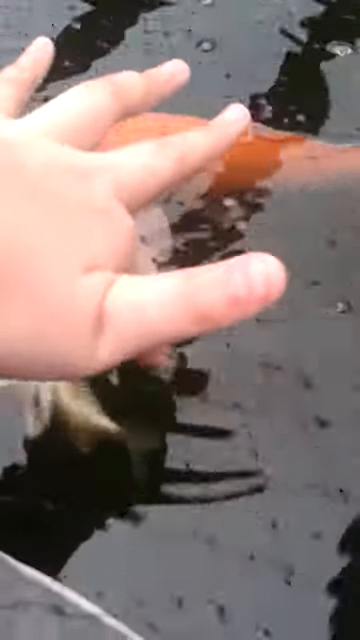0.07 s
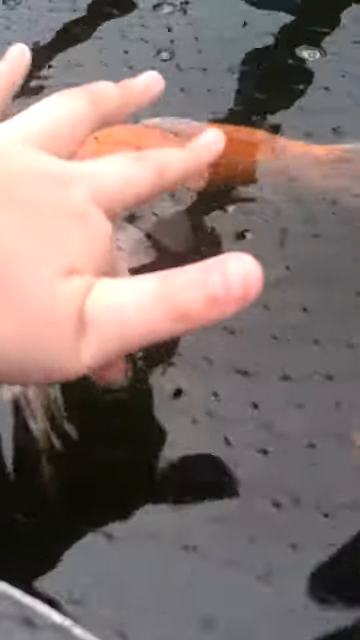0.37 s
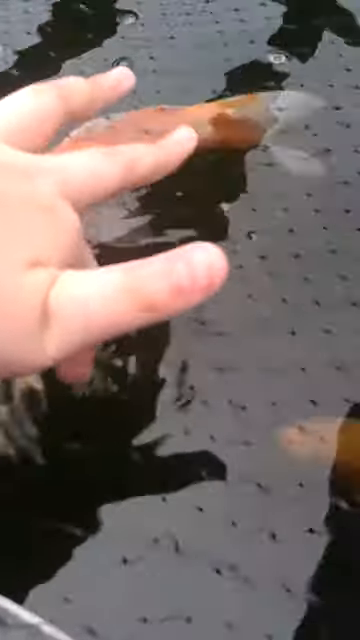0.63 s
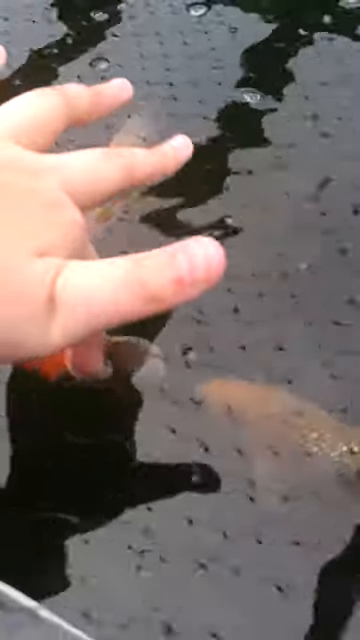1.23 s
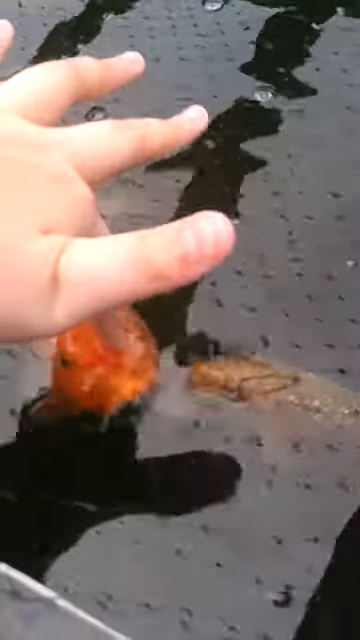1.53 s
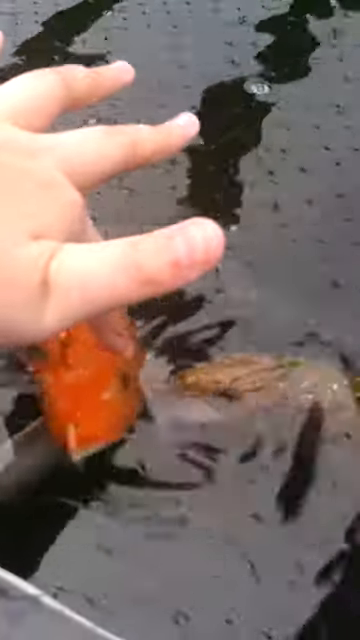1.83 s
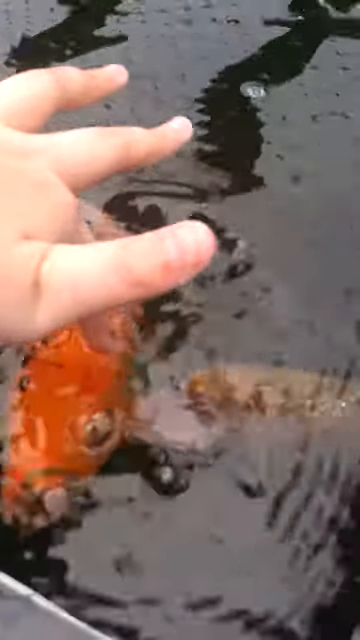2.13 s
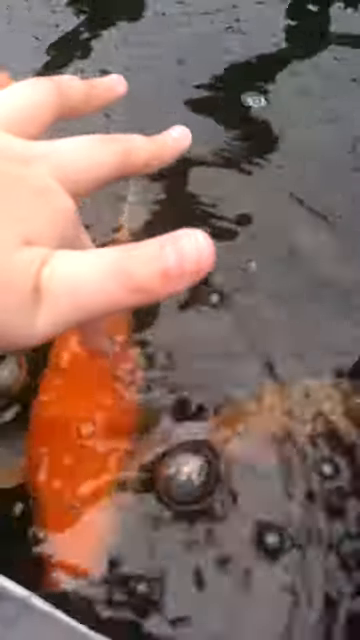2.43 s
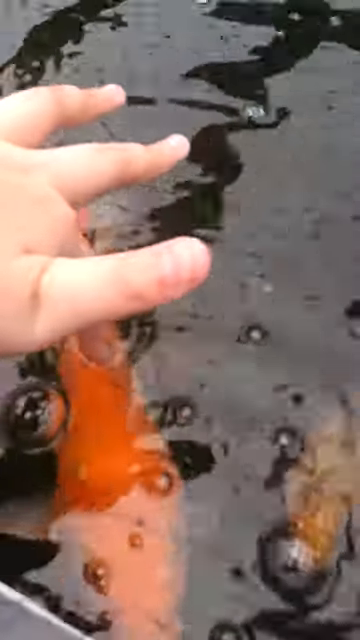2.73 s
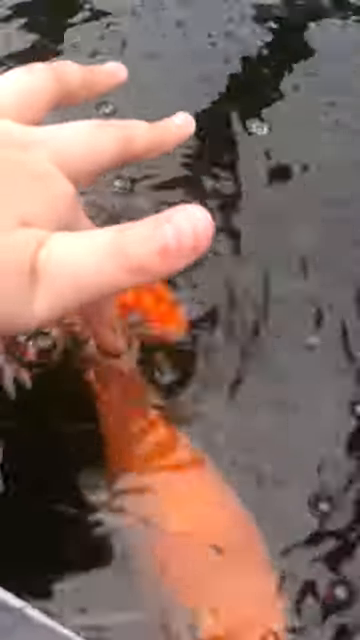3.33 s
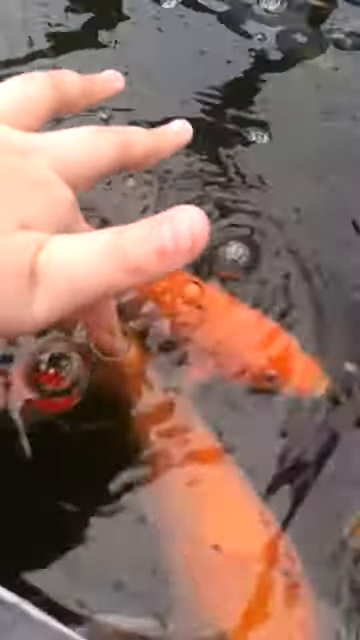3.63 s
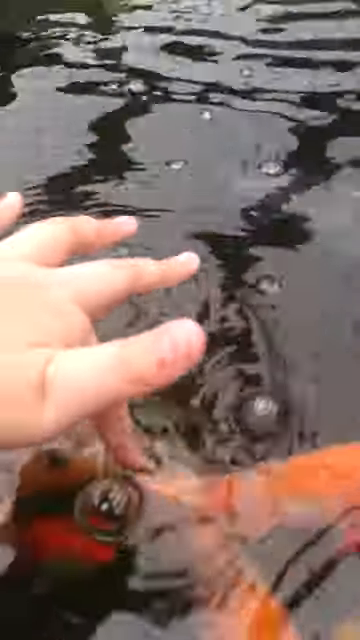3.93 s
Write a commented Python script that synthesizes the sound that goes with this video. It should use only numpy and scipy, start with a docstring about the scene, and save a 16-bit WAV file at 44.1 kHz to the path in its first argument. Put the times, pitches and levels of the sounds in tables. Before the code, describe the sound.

Fish mouths gulp and smack at a pond surface. In the first second there are only soft laps, faint swishes and tiny bubble pops. A small gulp comes at 1.3 seconds, a few rising gulps around 1.8, and a bright bubble click at 2.2. At 3 seconds one mouth smacks loudly and wetly with a brief fizz, followed by another gulp. Faint outdoor air and pump hum continue underneath.

```python
"""A faint pump hum, a low rumble and outdoor air are heard first, over a quiet pond where koi feed.
Tiny bubbles burst, water laps, a sleeve or water swishes as a hand moves, and mouths plop and gulp.
Each gulp is an air pocket in resonance, its pitch mostly rising as its size changes. Near 3 s one mouth
smacks loudly: wet lips part in a quick run of snaps that ring the mouth and the hollow under the
outstretched hand, and foam fizzes briefly."""
import sys
import numpy as np
from scipy import signal
from scipy.fft import rfft, irfft
from scipy.io import wavfile
from scipy.ndimage import uniform_filter1d

SR = 44100
rng = np.random.default_rng(int(sys.argv[2]) if len(sys.argv) > 2 else 0)


def master(y):
    """Save y as 16-bit WAV."""
    cut = np.clip(np.atleast_2d(y).T, -1, 1)
    pcm = np.round(cut * 32767)  # scale
    wavfile.write(sys.argv[1], SR, pcm.astype(np.int16))


N = 176400

# Levels in the tables are relative.
# partials of the pump (frequency [Hz], level [dB])
PUMP_PARTIALS = [(50, -74), (100.2, -67.5), (125, -76.5), (150, -89.5), (250, -82), (301, -80.5),
                 (500, -83), (1001, -81.5)]
# spectrum of outdoor air (frequency [Hz], level [dB])
AIR_SPECTRUM = [(76, -33), (130, 1), (217, -5.5), (249, -3), (275, -4), (342, -2.5), (425, -5.5), (549, -7),
                (953, -14), (1030, -12.5), (1440, -16), (1760, -17), (4710, -24), (6210, -23),
                (14500, -26.5)]
# slow swell of the air (time [s], level [dB])
AIR_ENVELOPE = [(0, 1), (.8, 0.7), (1.2, -1.6), (1.55, 1.3), (2.1, 1.1), (2.6, -1.6), (2.95, 0), (3.3, 0.8),
                (4, 1)]
# slow swell of the rumble (time [s], level [dB])
RUMBLE_ENVELOPE = [(0, 6), (.8, 5.5), (1.25, -2.5), (1.7, 1.5), (2.1, 0), (2.3, -13.5), (2.8, -6),
                   (3.2, 4.5), (4, 4.5)]
# tiny bursting bubbles (time [s], frequency [Hz], rise [s], level [dB])
BURSTS = [(.028, 6300, 0.0027, -61), (.546, 6270, .003, -58.5), (.547, 4350, .003, -61),
          (0.949, 6200, 0.0025, -59.5), (1.535, 6400, .007, -55.5), (2.2291, 9060, .0004, -40),
          (2.2293, 6350, 0.00064, -48), (2.2290, 12000, 0.00033, -47), (2.348, 13900, .0005, -54),
          (2.682, 6430, .003, -64), (2.928, 2650, .007, -67), (3.109, 8780, .001, -47),
          (3.1088, 11200, .0008, -55), (3.1093, 6070, 0.0011, -45.5), (3.409, 6200, 0.0034, -55.5),
          (3.427, 3520, 0.0015, -61.5), (3.668, 6700, .002, -62), (3.956, 8600, 0.0038, -62)]
# spectrum of the reflections (frequency [Hz], level [dB])
ECHO_SPECTRUM = [(200, 17), (800, 9), (1600, 2.5), (3000, -2.5), (4600, 10.5), (6400, 1), (9000, -3),
                 (14000, -14)]
# laps of water (time [s], duration [s], level [dB])
LAP_EVENTS = [(0.128, 0.071, -50.5), (0.218, 0.047, -58.5), (0.903, .09, -53.5)]
# spectrum of a lap (frequency [Hz], level [dB])
LAP_SPECTRUM = [(25, -24), (45, -14), (68, 9.5), (110, -4.5), (190, -16), (290, -8), (420, -24),
                (1500, -33), (6000, -42.5)]
# faint swishes of a sleeve or water as a hand moves (time [s], duration [s], level [dB])
SWISH_EVENTS = [(0.289, 0.19, -64), (0.407, 0.1, -65), (0.493, .12, -66.5), (0.923, 0.13, -69),
                (1.757, .15, -69.5)]
# spectrum of a swish (frequency [Hz], level [dB])
SWISH_SPECTRUM = [(150, 8), (400, 11), (1200, 4), (3200, -2), (4500, 0.5), (6500, 0.5), (8000, -9),
                  (14000, -14)]
# splashy plops, and at 1.533 s the broad part of a bubble burst (time [s], centre [Hz], half-width [Hz], rise
# [s], level [dB])
PLOP_EVENTS = [(0.546, 1210, 900, 0.0043, -62), (.680, 2270, 1100, 0.0036, -65),
               (1.336, 550, 400, 0.0062, -58), (1.533, 3050, 1830, 0.0069, -66.5),
               (1.779, 1000, 350, .006, -64.5), (3.034, 910, 249, 0.00085, -45),
               (3.151, 800, 400, 0.0013, -51)]
# gulped air (time [s], first pitch [Hz], pitch at closing [Hz], time to closing [s], rise [s], level [dB])
AIR_POCKETS = [(1.3395, 503, 565, 0.015, 0.00218, -49), (1.385, 387, 308, 0.024, 0.018, -62.5),
               (1.7873, 388, 422, .03, 0.00316, -44.5), (1.826, 458, 730, 0.028, 0.0063, -46.5),
               (1.826, 623, 1010, 0.0239, 0.0078, -48), (1.852, 935, 1420, 0.0643, 0.01, -54),
               (2.062, 131, 150, .03, .006, -56.5), (2.245, 600, 1310, 0.082, .024, -71),
               (3.131, 595, 910, 0.0154, 0.0045, -58.5), (3.151, 990, 1380, 0.03, 0.0014, -48),
               (3.157, 1256, 1940, 0.022, 0.0062, -51.5)]
# snaps of the smack (time [s], mouth level [dB], lip level [dB], film level [dB], film pitch [Hz])
LIP_SNAPS = [(3.0174, -57, -35.5, -27.5, 6430), (3.0220, -36, -44, -27.5, 6700),
             (3.0243, -36, -36, -28.5, 6100), (3.0271, -30, -32, -21, 6960), (3.0291, -20, -46, -21, 6750),
             (3.0306, -42, -30, -20, 6480), (3.0327, -44, -49, -20, 6050)]
# spectrum of the spray (frequency [Hz], level [dB])
SPRAY_SPECTRUM = [(300, -27), (600, -3), (1100, -5.5), (1600, 6), (2100, -2), (2700, 6.5), (4500, -2.5),
                  (5200, -11), (6300, 5), (8200, -5), (10500, -8.5), (14500, -14)]
# modes of the hollow under the hand (frequency [Hz], T60 [s], level [dB])
HOLLOW_MODES = [(1030, .03, -5), (1590, 0.072, -6), (2720, 0.035, -4), (3200, .04, -15), (3700, 0.022, 3.5),
                (5870, 0.04, -2), (7010, .02, -14)]
# spectrum of the foam (frequency [Hz], level [dB])
FOAM_SPECTRUM = [(400, -0.5), (1500, -7), (2300, -6.5), (4700, -2), (5300, -8.5), (6400, -7), (7300, -2),
                 (8000, -8), (9500, -9), (12000, -23), (14500, -22.5)]


def undb(db):
    """Decibels are a logarithmic scale: amplitude grows tenfold per 20 dB."""
    return 10 ** (np.asarray(db) / 20)


def unit(x):
    """Normalisation to an rms of 1."""
    return x / np.sqrt(np.mean(x ** 2))


def clock():
    """Uniform sampling: the time of every sample in seconds."""
    return np.arange(N) / SR


def noise(spectrum):
    """Spectral shaping: noise follows (frequency [Hz], level [dB]) points, fading below the first."""
    hz, db = np.array(spectrum, float).T
    f = np.arange(N // 2 + 1) * SR / N + 1
    gain = undb(np.interp(np.log(f), np.log(hz), db)) * np.minimum(f / hz[0], 1) ** 2
    return unit(irfft(rfft(rng.standard_normal(N)) * gain, N))


def band(hz, half_width):
    """Resonance: noise confined to one steep-sided band."""
    f = np.arange(N // 2 + 1) * SR / N
    attenuation = (1 + ((f - hz) / half_width) ** 2 / 2) ** 2
    return unit(irfft(rfft(rng.standard_normal(N)) / attenuation, N))


def drift(per_s):
    """A moving average smooths random steps into a drift of rms 1."""
    hold = int(SR / per_s)
    steps = np.repeat(rng.standard_normal(N // hold + 1), hold)
    return unit(uniform_filter1d(steps, hold)[:N])


def swell(start, rise):
    """Critically damped response: a peak after the rise time, then decay."""
    u = np.clip((clock() - start) / rise, 0, 40)
    return u * np.exp(1 - u)


def arch(start, length):
    """Amplitude envelope: the square root of half a sine cycle."""
    return np.sqrt(np.abs(np.sin(np.pi * np.clip((clock() - start) / length, 0, 1))))


def ping(start, hz, rise, hz_per_s=0):
    """Damped oscillation: a resonator rings briefly, gliding if its size changes."""
    age = np.maximum(clock() - start, 0)
    pitch = np.clip(hz + hz_per_s * age, hz / 2, SR / 2) * (age > 0)
    return swell(start, rise) * np.sin(2 * np.pi * np.cumsum(pitch) / SR)


def pump_hum(waver_db=0.5, waver_rad=0.28):
    """Amplitude and phase modulation: each partial of the pump wavers at random."""
    hum = 0
    for hz, db in PUMP_PARTIALS:
        amplitude = np.sqrt(2) * undb(db + waver_db * drift(5.18))
        phase = 2 * np.pi * (hz * clock() + rng.random()) + waver_rad * drift(4.6)
        hum += amplitude * np.sin(phase)
    return hum


def outdoor_air(base_db=-66, flicker_db=0.52):
    """Broadband noise: a flickering hiss and a faint treble band swell together."""
    hiss = undb(base_db + flicker_db * drift(40)) * noise(AIR_SPECTRUM)
    sheen = undb(-81) * band(hz=6000, half_width=970)
    return (hiss + sheen) * undb(np.interp(clock(), *np.array(AIR_ENVELOPE).T))


def rumble(base_db=-74):
    """Narrowband noise: a low rumble slowly swells and sinks."""
    level_db = base_db + np.interp(clock(), *np.array(RUMBLE_ENVELOPE).T)
    return undb(level_db) * band(hz=57.3, half_width=17)


def bursting_bubbles(relative_width=0.094):
    """Transient excitation: each tiny bubble bursts with a short, bright band of noise."""
    return sum(undb(db) * swell(start, rise) * band(hz, relative_width * hz) / 2
               for start, hz, rise, db in BURSTS)


def reflections(direct, delay_s=0.0059):
    """Reverberation: quick echoes from the pond's edge and a faint longer tail join the direct sound."""
    age = clock() - delay_s
    response = 0
    for db, t60 in ((-16.5, 0.075), (-27.5, 0.55)):  # near, far
        tail = noise(ECHO_SPECTRUM) * (age > 0) * np.exp(-np.log(1000) * np.abs(age) / t60)
        response += undb(db) * tail / np.sqrt(2 * np.sum(tail ** 2))
    return direct + signal.fftconvolve(direct, response)[:N]


def laps():
    """Enveloped noise: water laps in low, rounded pulses."""
    return noise(LAP_SPECTRUM) * sum(undb(db) * arch(start, length) for start, length, db in LAP_EVENTS)


def swishes(grain_db=1.5, grains_per_s=350):
    """Random amplitude modulation: soft, grainy swishes of a sleeve or water as a hand moves."""
    grainy = unit(noise(SWISH_SPECTRUM) * undb(grain_db * drift(grains_per_s)))
    return grainy * sum(undb(db) * arch(start, length) for start, length, db in SWISH_EVENTS)


def plops():
    """Impact: water slaps shut around a mouth and excites a broad band of noise; the band at 1.533 s instead
    widens the tiny bubble burst there."""
    return sum(undb(db) * swell(start, rise) * band(hz, half_width)
               for start, hz, half_width, rise, db in PLOP_EVENTS)


def gulps(closing_decay_s=0.027):
    """Bubble resonance: an air pocket glides in pitch as its size changes and dies faster on closing."""
    notes = 0
    for start, hz, closing_hz, open_s, rise, db in AIR_POCKETS:
        damping = np.exp(-np.maximum(clock() - start - open_s, 0) / closing_decay_s)
        notes += undb(db) * ping(start, hz, rise, (closing_hz - hz) / open_s) * damping
    return notes


def smack(spray_db=-12.5):
    """Impulse excitation: each snap rings the mouth cavity, lip gap and water film, and throws spray."""
    spray_noise = noise(SPRAY_SPECTRUM)
    snaps = 0
    for start, mouth_db, lip_db, film_db, film_hz in LIP_SNAPS:
        mouth = undb(mouth_db) * ping(start, hz=1490, rise=0.001)
        lips = undb(lip_db) * ping(start, hz=3300, rise=0.00057)
        film = ping(start, film_hz, rise=0.00056)
        spray = undb(spray_db) * spray_noise * swell(start, rise=0.0011)  # relative to the film
        snaps += mouth + lips + undb(film_db) * (film + spray)
    return snaps


def hand_hollow(snaps):
    """Cavity resonance: the snaps drive the modes of the hollow under the hand, which ring on."""
    rings = 0
    for hz, t60, db in HOLLOW_MODES:
        radius = np.exp(-np.log(1000) / (t60 * SR))
        pole = radius * np.exp(2j * np.pi * hz / SR)
        rings += undb(db) * 2 * (1 - radius) * signal.lfilter([1], [1, -pole], snaps).real
    return snaps + rings


def foam(level_db=-47.5):
    """Decaying broadband noise: foam fizzes from the second snap on, as the lips part."""
    return undb(level_db) * noise(FOAM_SPECTRUM) * swell(LIP_SNAPS[1][0], rise=0.013)


def scene():
    """Superposition: the sounds of the pond add at one microphone."""
    feeding = hand_hollow(smack()) + foam() + gulps() + plops() + bursting_bubbles()
    return (reflections(feeding) + laps() + swishes() + pump_hum() + outdoor_air() + rumble())[None]


def record(dry):
    """Band limiting: a steep low-pass filter removes the treble above 14.8 kHz."""
    return signal.sosfilt(signal.ellip(10, .2, 70, 14800, fs=SR, output="sos"), dry)


dry = scene()
out = record(dry)
master(out)
```